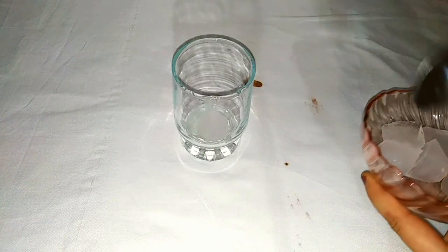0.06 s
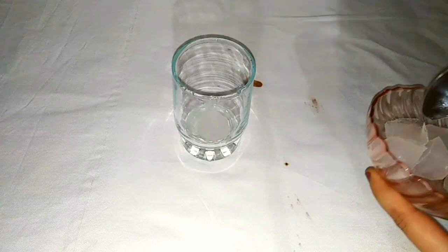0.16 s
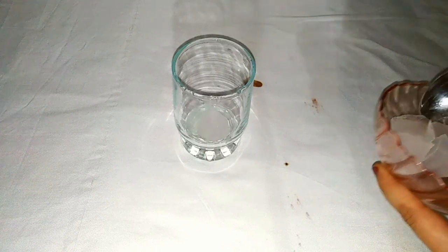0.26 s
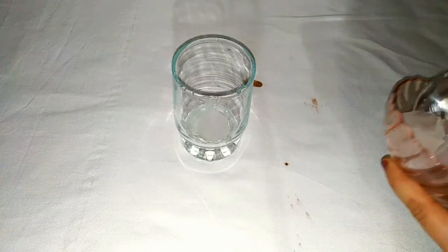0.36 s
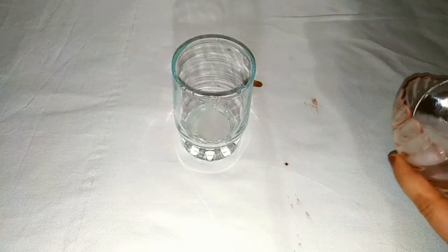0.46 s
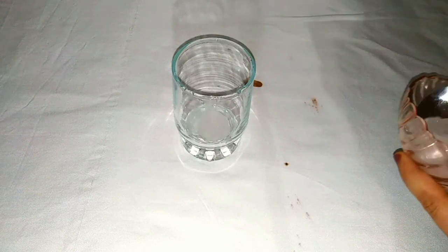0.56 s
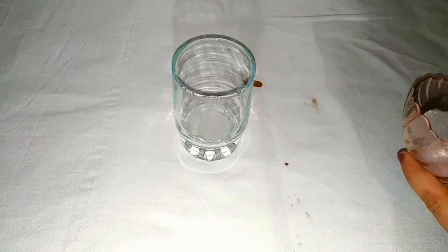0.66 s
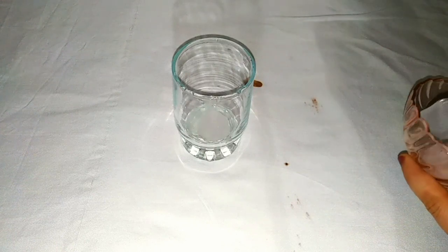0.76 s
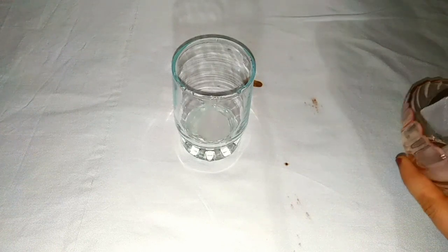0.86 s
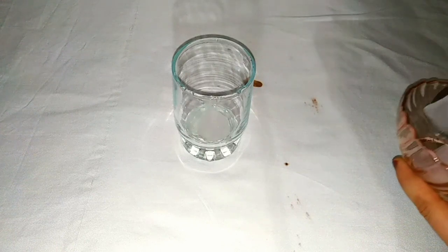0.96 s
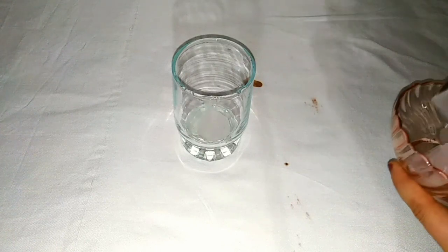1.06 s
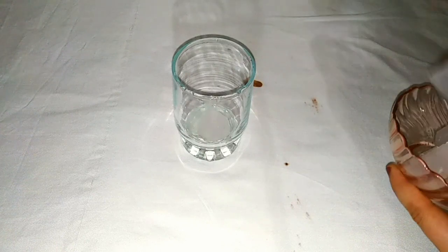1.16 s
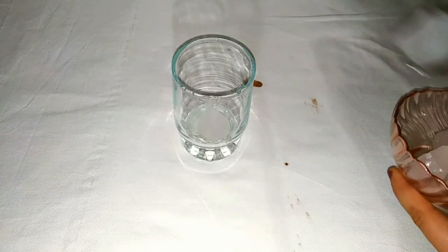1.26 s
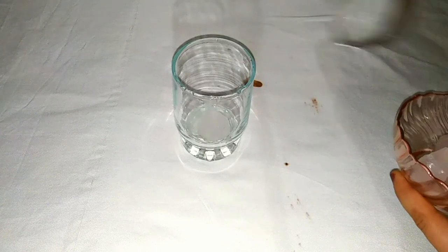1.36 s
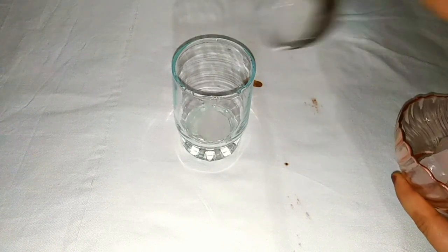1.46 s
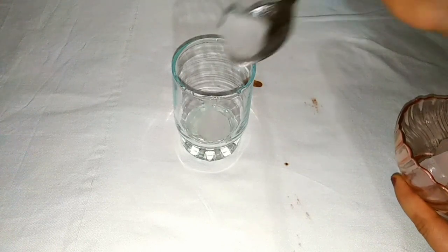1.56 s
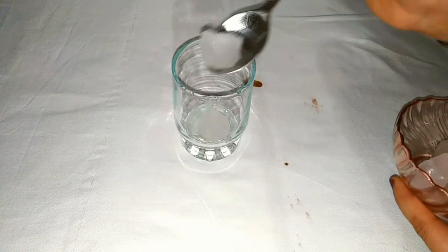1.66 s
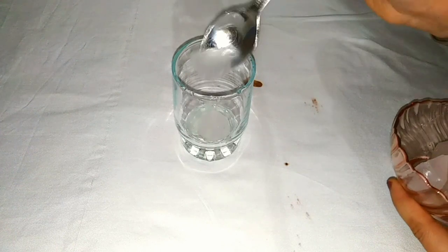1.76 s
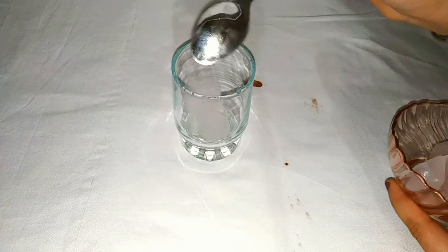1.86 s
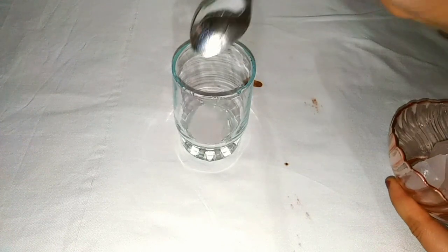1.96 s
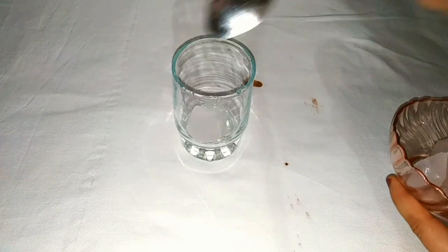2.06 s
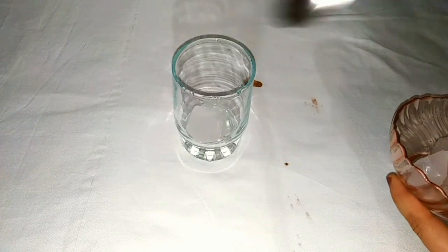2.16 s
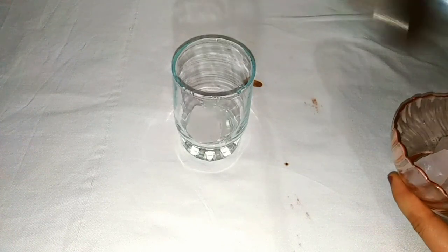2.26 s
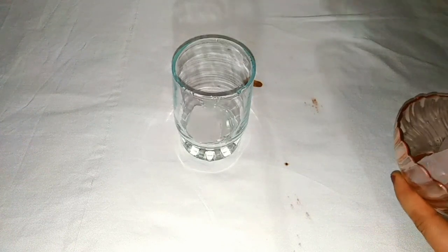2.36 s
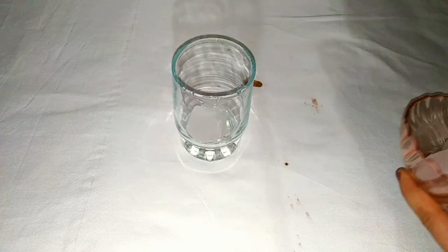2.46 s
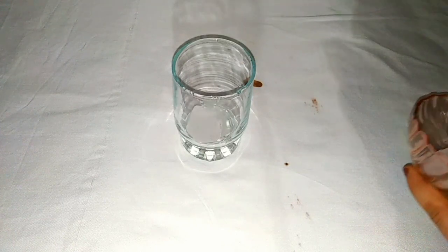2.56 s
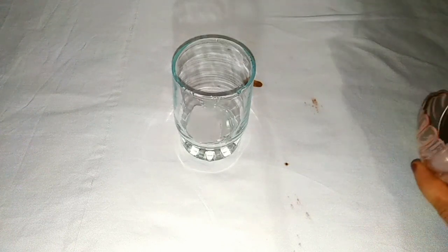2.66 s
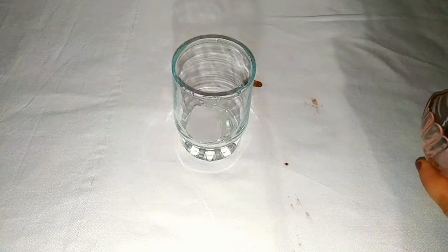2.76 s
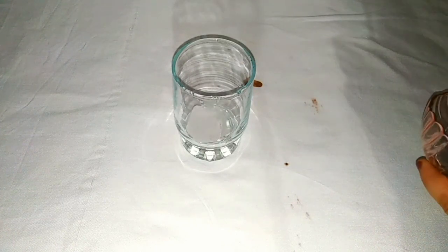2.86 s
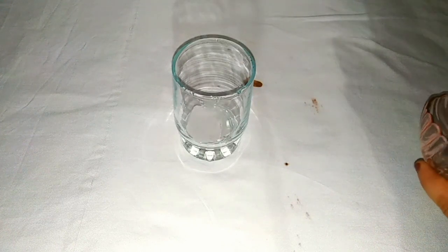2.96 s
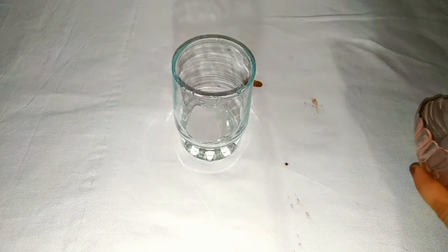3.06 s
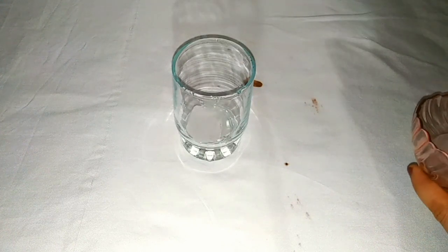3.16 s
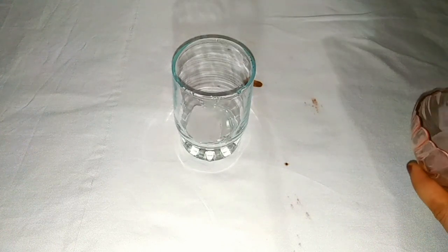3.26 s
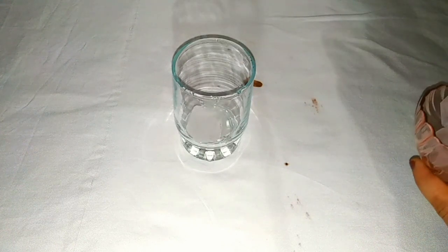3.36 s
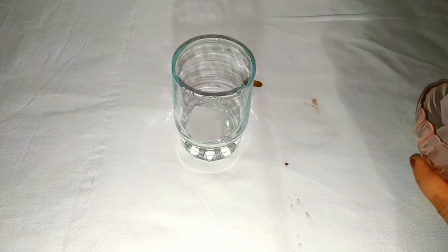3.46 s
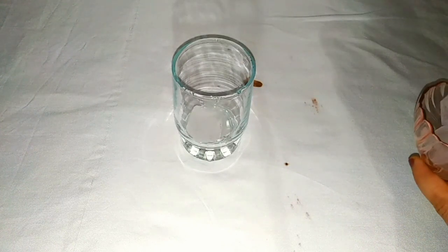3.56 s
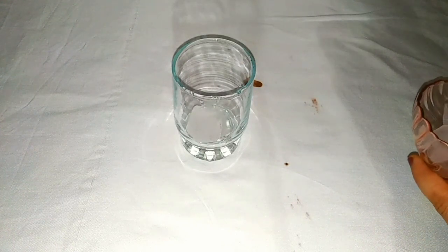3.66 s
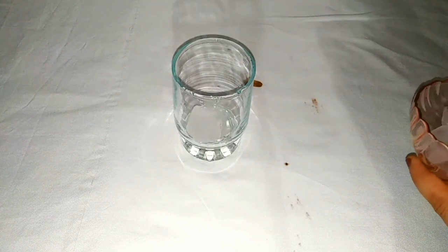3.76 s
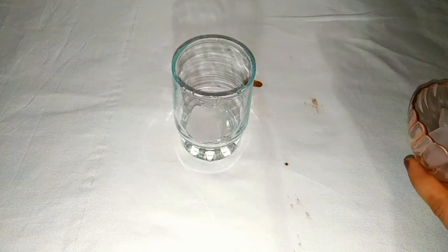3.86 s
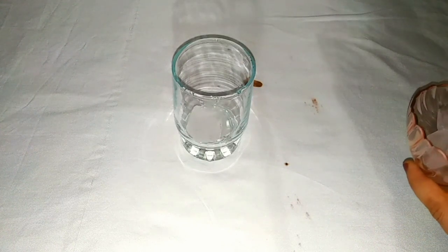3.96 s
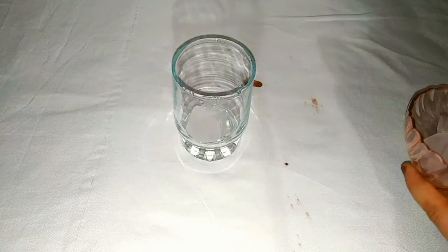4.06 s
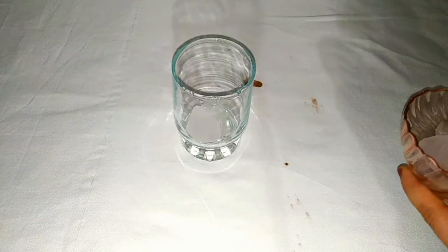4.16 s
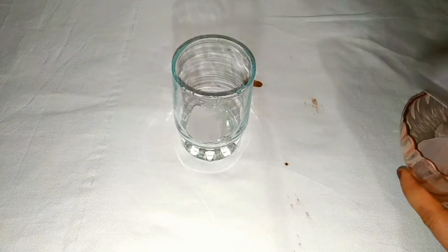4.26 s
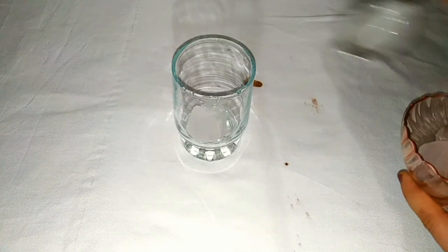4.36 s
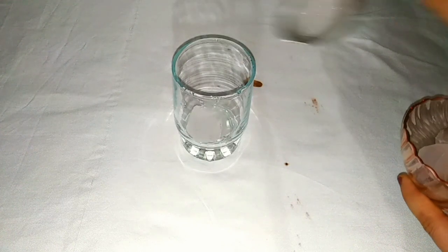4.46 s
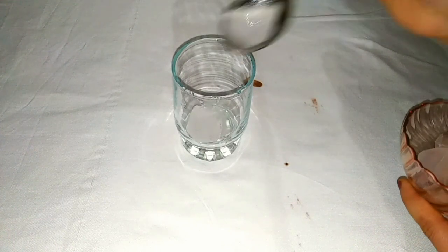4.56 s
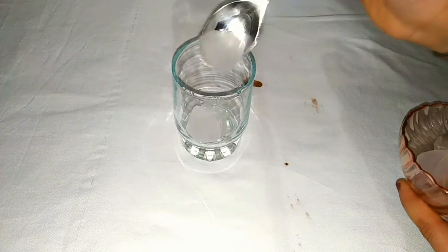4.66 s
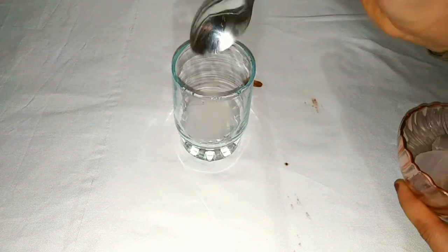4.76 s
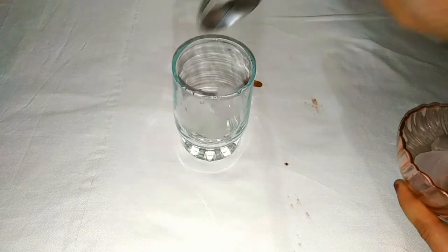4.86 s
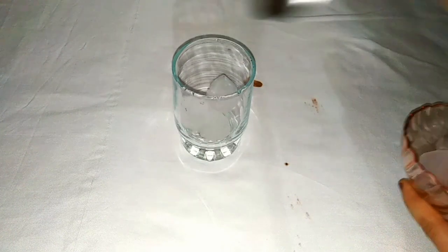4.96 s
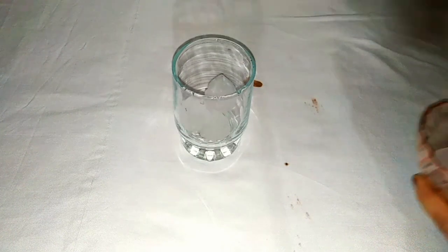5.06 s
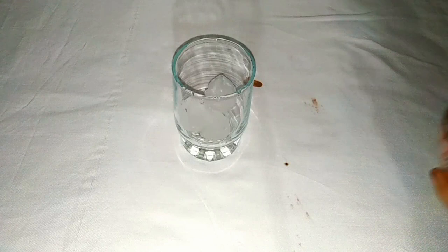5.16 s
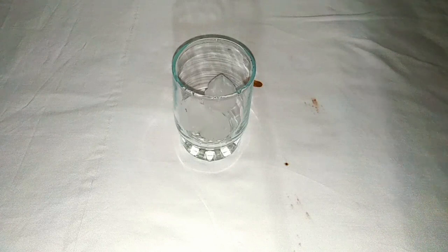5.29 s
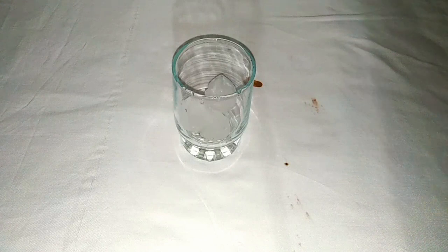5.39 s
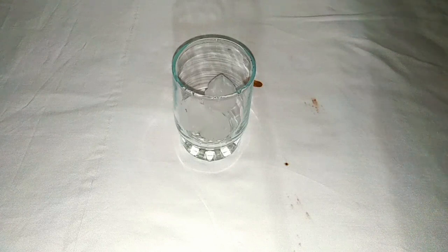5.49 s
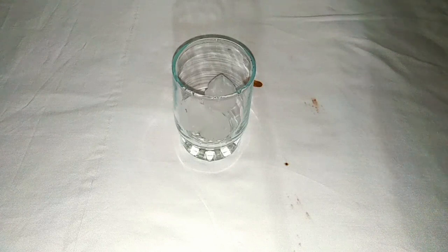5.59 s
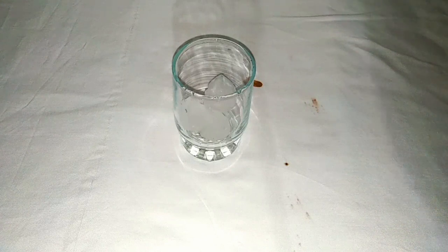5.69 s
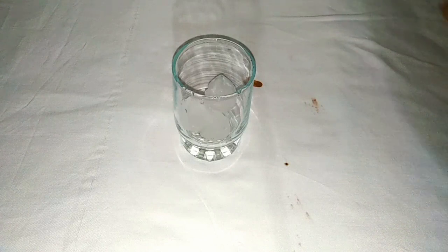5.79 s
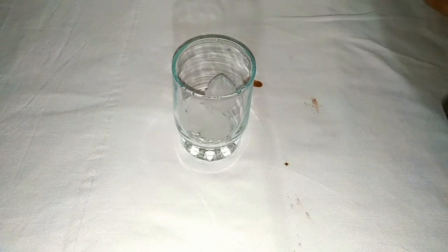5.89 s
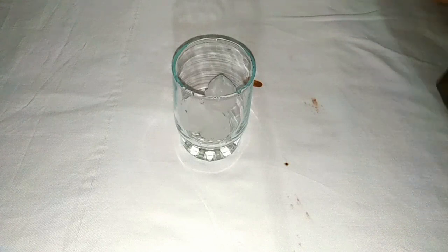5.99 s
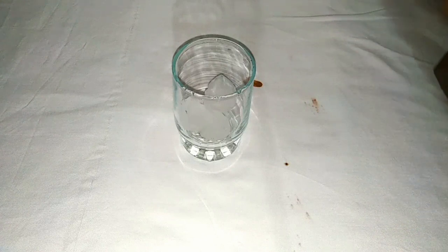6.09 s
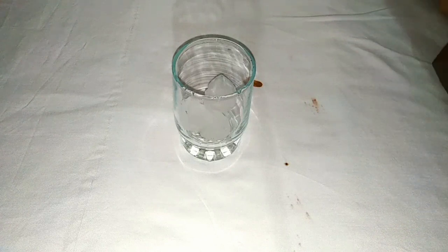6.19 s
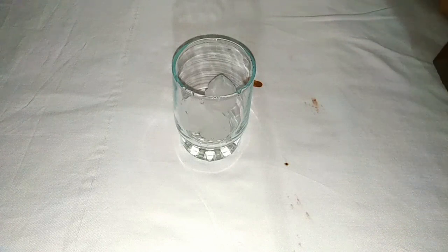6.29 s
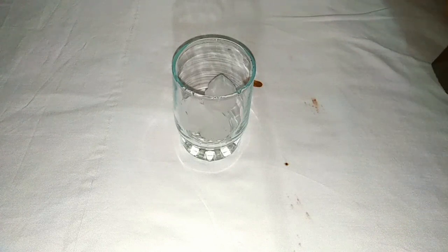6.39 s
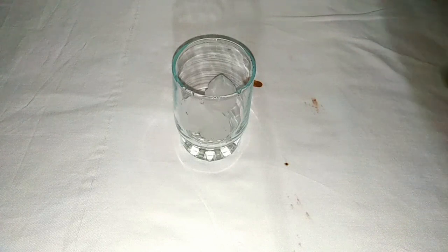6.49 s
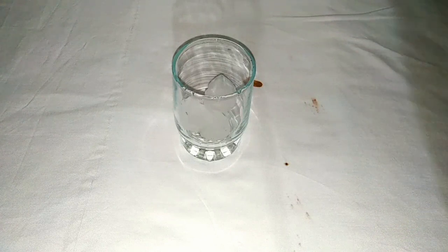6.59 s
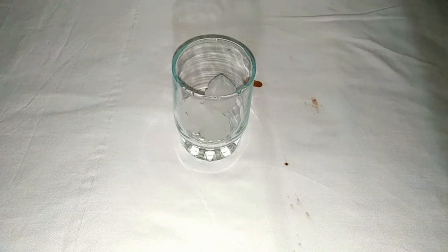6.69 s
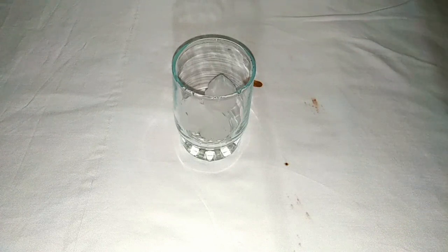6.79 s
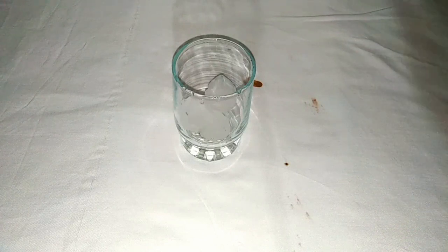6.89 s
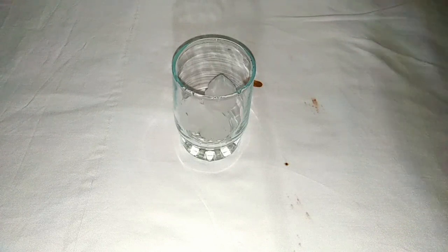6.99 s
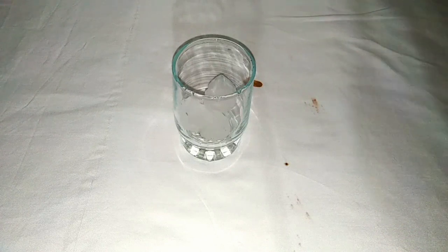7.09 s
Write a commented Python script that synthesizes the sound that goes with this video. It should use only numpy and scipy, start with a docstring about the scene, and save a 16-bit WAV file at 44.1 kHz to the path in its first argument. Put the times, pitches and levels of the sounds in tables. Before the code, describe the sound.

A spoon knocks and digs through ice in a glass bowl, then ice drops with sharp clinks into a drinking glass, twice, in a quiet room.

```python
"""A small quiet room, two microphone ports close to a thick ribbed bowl and a drinking glass, low rumble under all,
with patchy faint noise above it. From 0.4 s a spoon knocks and digs through ice in the bowl: short noise bursts,
short modes, a grind of tiny clicks. At 1.9 s ice drops into the glass: cracks strike its air column and wall modes,
and the ice chokes them. From 2.7 s the spoon digs again, at 4.8 s more ice drops, scattered knocks and a rustle of
cloth end it. Faint bumps, squeaks, tinks and lone tones lie between; decaying noise gives the room's echoes."""
import sys
import numpy as np
from scipy import signal
from scipy.fft import rfft, irfft, next_fast_len
from scipy.io import wavfile
from scipy.ndimage import uniform_filter1d

SR = 44100
rng = np.random.default_rng(int(sys.argv[2]) if len(sys.argv) > 2 else 0)


def generate_wav(signal):
    """Clip the signal to [-1, 1] and save it as 16-bit WAV at the path in sys.argv[1]."""
    frames = np.transpose(np.atleast_2d(signal))
    scaled = np.clip(frames, -1, 1) * 32767
    pcm = np.round(scaled).astype(np.int16)
    wavfile.write(sys.argv[1], SR, pcm)


N = 314735
GLASS_LAG, BOWL_LAG = 10, -9   # samples by which the left port hears later


def amp(db):
    """dB to gain."""
    return 10 ** (np.asarray(db) / 20)


def rms_one(x):
    """Scale to rms 1."""
    return x / np.sqrt(np.mean(x ** 2) + 1e-20)


def at_hz(points, hz):
    """Read a table on a log-frequency axis."""
    table_hz, values = np.array(points).T
    return np.interp(np.log(np.maximum(hz, 1)), np.log(table_hz), values)


def curve_db(rows):
    """Level curve at every sample, -150 dB outside the table."""
    return np.interp(np.arange(N) / SR, *np.transpose(rows), left=-150, right=-150)


def band(x, low_hz, high_hz):
    """Band-pass."""
    return signal.sosfilt(signal.butter(2, [low_hz, high_hz], "band", fs=SR, output="sos"), x)


def split_pass(x, order, hz, kind):
    """Low-pass or high-pass."""
    return signal.sosfilt(signal.butter(order, hz, kind, fs=SR, output="sos"), x)


def colour(x, spectrum):
    """Filter with the gains of a spectrum table in dB, without added phase."""
    size = next_fast_len(N)
    hz = np.arange(size // 2 + 1) * SR / size
    return irfft(rfft(x, size) * amp(at_hz(spectrum, hz)), size)[..., :N]


def drift(rate):
    """Slow random wander of rms 1: noise through two equal poles at rate Hz, computed every 40 samples."""
    r = np.exp(-80 * np.pi * rate / SR)
    slow = signal.lfilter([1], [1, -2 * r, r * r], rng.standard_normal(N // 40 + 2002))[2000:]
    return np.interp(np.arange(N) / 40, np.arange(len(slow)), rms_one(slow))


def strokes(rows, rise, fall):
    """Gain of strokes that rise, hold along a slope and fall away (rise and fall in dB per s)."""
    t = np.arange(N) / SR
    total = 0
    for start, length, from_db, to_db in rows:
        end = start + length
        slope_db = np.interp(t, [start, end], [from_db, to_db])
        total = total + amp(slope_db - rise * np.maximum(start - t, 0) - fall * np.maximum(t - end, 0))
    return total


def clicks(s, db):
    """A click train."""
    out = np.full(N, 1e-18)
    np.add.at(out, np.round(np.asarray(s) * SR).astype(int), amp(db))
    return out


def ring(x, hz, t60):
    """A mode: a unit click sets a dying sine of height 1 ringing."""
    r, w = amp(-60 / (t60 * SR)), 2 * np.pi * hz / SR
    return signal.lfilter([0, np.sin(w)], [1, -2 * r * np.cos(w), r * r], x)


def strike(x, hz, t60):
    """A soft contact feeds a mode only with what lies near its pitch."""
    peak = signal.iirpeak(hz, 7, fs=SR)
    return ring(signal.lfilter(*peak, signal.lfilter(*peak, x)), hz, t60)


def crack(x, t60):
    """Each click becomes a burst of noise that swells for a moment and dies at once."""
    swell = amp(-60 / (.003 * SR))
    poles = np.convolve([1, -amp(-60 / (t60 * SR))], [1, -swell])
    return signal.lfilter([1 - swell], poles, x) * rng.standard_normal(N)


def ports(x, pan_db, lag):
    """Two microphone ports: a left-over-right level difference and a lag."""
    left = np.roll(x, max(lag, 0)) * amp(pan_db / 2)
    right = np.roll(x, max(-lag, 0)) * amp(-pan_db / 2)
    return np.array([left, right])


# Spectrum of the low rumble: f/Hz, relative level per Hz/dB
RUMBLE_SPECTRUM = [(15, -66.5), (25, -29.5), (59, -4.5), (111, 1), (200, -5.5), (229, -3.5), (263, -6),
                   (607, -15), (695, -27.5), (887, -22), (1230, -47), (2160, -39.5), (3620, -48),
                   (12900, -48.5), (16000, -55.5)]
# How alike the rumble is at both ports: f/Hz, likeness (0 none, 1 full)
RUMBLE_LIKENESS = [(60, 0.24), (240, 0.86), (950, 0), (3770, 0.053), (15000, 0)]
# Lean of the rumble to the left port: f/Hz, left-right level/dB
RUMBLE_LEAN = [(60, -1), (240, -1), (950, 0), (3770, -3), (15000, 1)]
# Level of the patchy faint noise between 500 and 1000 Hz: t/s, level/dB
PATCHY_LEVEL = [(0, -103), (.2, -60), (.8, -66), (1.8, -93), (2.1, -62), (2.6, -77), (3.1, -73), (3.9, -53),
                (4.3, -102.5), (5.0, -64), (5.5, -81), (6.1, -83), (6.3, -67), (7.13, -72.5)]


def hush():
    """Low rumble, partly alike at both ports, its low octaves heaving, and patchy noise strips at 500-1000 Hz."""
    mid, side, other = rng.standard_normal((3, N))
    hz, alike = np.array(RUMBLE_LIKENESS).T
    mid = colour(mid, np.c_[hz, 10 * np.log10(1 + alike)])
    side = colour(side, np.c_[hz, 10 * np.log10(1 - alike)])
    lean = np.array(RUMBLE_LEAN)
    pair = np.array([colour(mid + side, lean * [1, .5]), colour(mid - side, lean * [1, -.5])])

    noise, edges = other + .6 * rng.standard_normal((2, N)), np.geomspace(500, 980, num=7)
    # each narrow strip comes and goes by itself
    patchy = rms_one(sum(band(noise, lo, hi) * amp(6 * drift(2)) for lo, hi in zip(edges, edges[1:])))

    steady = rms_one(colour(pair, RUMBLE_SPECTRUM))
    together_db = 2.5 * drift(4)
    # each low octave heaves partly with the others, partly alone
    lumps = sum(band(steady, lo, 2 * lo) * (amp(together_db + 2.5 * drift(5)) - 1)
                for lo in (60, 120, 240, 480))
    return amp(-56.5) * (steady + lumps) + amp(curve_db(PATCHY_LEVEL)) * patchy


# Decay of the echoes: f/Hz, t60/s
ROOM_DECAY = [(600, 0.37), (1500, 0.32), (2800, 0.29), (4200, 0.31), (6500, 0.27), (9000, 0.29),
              (12000, .25)]
# What the walls return: f/Hz, relative level/dB
WALL_COLOUR = [(500, 7.5), (1500, -4.5), (4000, -2.5), (7000, -6), (12000, -5)]


def room(x):
    """Diffuse echoes: noise dying band by band, different at each port, swelling in over about 2 ms."""
    t, edges = np.arange(SR // 2) / SR, 300 * 2 ** np.arange(0, 6.1, .5)
    white = rng.standard_normal((2, len(t)))
    tail = sum(band(white, lo, hi) * amp(-60 * t / at_hz(ROOM_DECAY, np.sqrt(lo * hi)))
               for lo, hi in zip(edges, edges[1:]))
    tail = colour(tail, WALL_COLOUR)[:, :len(t)] * (1 - np.exp(-t / 0.002))
    tail = tail / np.sqrt(np.sum(tail ** 2) / 2)
    return signal.fftconvolve(x[None], tail, axes=1)[:, :N]


# A sleeve brushing the tablecloth: t/s, length/s, relative level at start/dB, at end/dB
SLEEVE_STROKES = [(.18, .04, -79, -84), (1.21, 0.056, -103, -84), (4.57, .03, -79, -80),
                  (6.37, 0.029, -74.5, -76), (6.66, 0.14, -64, -72), (6.95, 0.16, -79, -80.5)]
# Spectrum of the cloth: f/Hz, relative level/dB
CLOTH_SPECTRUM = [(880, -50), (1500, -29), (2400, -10.5), (4900, -4), (7700, -4), (8350, -22.5),
                  (13000, -40)]


def rustle():
    """Sleeve on tablecloth: patchy hiss, only slightly alike at both ports."""
    hiss = colour(rng.standard_normal(N) + 3.3 * rng.standard_normal((2, N)), CLOTH_SPECTRUM)
    patches = amp(2.2 * drift(20) + 2 * drift(120))
    return rms_one(hiss) * patches * strokes(SLEEVE_STROKES, rise=240, fall=130)


# Dull bumps through the table: t/s, relative level/dB, f/Hz, left-right level/dB
TABLE_BUMPS = [(0.22, -32.5, 95.2, 37), (0.247, -36, 90.2, 20), (2.316, -34.5, 97, 11.5),
               (2.418, -43, 91, 19), (4.395, -38.5, 84, 16.5)]


def table_bumps():
    """Bumps through the table: 10 ms soft pushes set low, short modes ringing."""
    push = np.hanning(SR // 100) / (SR // 200)
    return sum(ports(ring(signal.oaconvolve(clicks([start], db), push)[:N], hz, t60=.15), pan_db, 0)
               for start, db, hz, pan_db in TABLE_BUMPS)


# Faint lone tones: t/s, f/Hz, relative level/dB, t60/s
LONE_TONES = [(.001, 1960, -54, 0.12), (2.409, 2913, -62, 0.68), (4.159, 1123, -58, 0.073)]


def lone_tones():
    """Faint sines that swell in over about 30 ms, waver and die away."""
    t = np.arange(N) / SR
    swell = np.exp(-t[:SR // 5] / 0.03)
    out = 0
    for start, hz, db, t60 in LONE_TONES:
        decay = amp(np.minimum(db - 60 * (t - start) / t60, 0)) * (t > start)
        level = signal.oaconvolve(decay, swell / swell.sum())[:N]
        out = out + level * amp(6.5 * drift(35)) * np.sin(2 * np.pi * hz * t)
    return out


# Wet squeaks on the spoon: t/s, start f/Hz, end f/Hz, length/s, relative level/dB
SPOON_SQUEAKS = [(1.221, 11840, 8700, 0.022, -53), (1.256, 11400, 8240, 0.034, -49.5)]


def squeaks():
    """Wet slips on the spoon: short falling glides, uneven in level."""
    t = np.arange(N) / SR
    out = 0
    for start, from_hz, to_hz, length, db in SPOON_SQUEAKS:
        u = np.clip((t - start) / length, 0, 1)
        glide = np.sin(2 * np.pi * np.cumsum(from_hz + (to_hz - from_hz) * u) / SR)
        out = out + amp(db + 9.3 * drift(220)) * np.sin(np.pi * u ** .6) ** 2 * glide
    return out


# The bare spoon touched: t/s, then relative level/dB of each of its three modes
SPOON_TOUCHES = [(5.569, -63, -63, -58), (5.6471, -57.5, -77, -82), (5.9464, -69.5, -65.5, -99)]
# Modes of the spoon: f/Hz, t60/s
SPOON_MODES = [(11100, 0.18), (12700, .3), (13700, 0.23)]


def spoon_tinks():
    """Touches on the bare spoon ring its three high modes."""
    s, *modes_db = np.transpose(SPOON_TOUCHES)
    return sum(strike(clicks(s, db), hz, t60) for db, (hz, t60) in zip(modes_db, SPOON_MODES))


def small_sounds():
    """Tinks, squeaks and tones placed at the bowl, with table bumps; returns near sound and room feed."""
    faint = spoon_tinks() + squeaks() + lone_tones()
    return ports(faint, -1.3, BOWL_LAG) + table_bumps(), faint * amp(-10.0)


# The spoon digs: t/s, length/s, relative level at start/dB, at end/dB, treble over that/dB
DIGS = [(0.45, 0.37, -49, -54.5, -0.5), (2.675, 0.3, -61, -44.5, -1), (2.982, .25, -51, -48.5, 8.5),
        (3.618, 0.332, -54, -57.5, 7), (5.601, 0.18, -48.5, -52.5, -15.5)]
# Colour of the small grinding cracks: f/Hz, relative level per Hz/dB
GRAIN_COLOUR = [(400, -21.5), (1100, -4), (2500, -5.5), (5000, -7.5), (7500, -5), (9000, -31.5),
                (12500, -10), (15000, -32)]


def ice_grind():
    """The spoon digs through ice: clumped random clicks, each ringing one of ten short resonances."""
    grains_per_s, clump_db = 810, 4.5   # median rate, its swing
    chance = grains_per_s * amp(clump_db * drift(12)) / SR
    strength = amp(4.0 * np.minimum(rng.exponential(1, N), 4)) * rng.choice([-1, 1], N)
    grains = (rng.random(N) < chance) * strength
    dealt, pitches = rng.integers(0, 10, N), np.geomspace(900, 13000, num=10)
    crunch = sum(ring(grains * (dealt == k) + 1e-18, hz, 7.45 / hz) * np.sqrt(hz)
                 for k, hz in enumerate(pitches))
    crunch = rms_one(colour(crunch, GRAIN_COLOUR))
    treble, body = split_pass(crunch, 4, 8500, "high"), split_pass(crunch, 4, 8500, "low")
    rows = np.array(DIGS)
    treble_rows = np.c_[rows[:, :2], rows[:, 2:4] + rows[:, 4:]]
    return body * strokes(rows[:, :4], rise=464, fall=138) + treble * strokes(treble_rows, rise=464, fall=138)


# Spoon and ice knocking in the bowl: t/s, then relative level/dB of crack, dull part, bright part
# and low ring, then left-right level/dB
BOWL_KNOCKS = [(0.3928, -19, -28.5, -13.5, -30, 7.5), (0.4216, -22.5, -21.5, -62, -61, -0.5),
               (0.4542, -40, -36, -31, -55.5, -14), (0.471, -21, -12.5, -24.5, -58.5, 0.5),
               (0.4941, -15.5, -18.5, -36, -51, -5.5), (0.5542, -21.5, -27, -35, -66, 3),
               (0.5631, -23, -22, -48, -60, 0), (0.6372, -26, -28.5, -27.5, -48, -4.5),
               (0.7472, -14.5, -17, -55, -46, -5.5), (0.7542, -19, -18, -33, -49.5, 3),
               (0.7621, -21, -21.5, -54, -46, 4), (0.804, -52, -32, -48, -68, -8),
               (0.8432, -25, -29, -46, -39.5, 0), (0.8597, -24, -30, -67, -48, -2),
               (0.9085, -27, -17.5, -68, -32, -1.5), (1.21, -63, -46, -74, -101, 2.5),
               (1.245, -66.5, -48, -75, -87, -4), (1.334, -52.5, -30, -77, -82.5, -5),
               (2.667, -41.5, -33.5, -53, -65, -10), (2.7697, -28.5, -19, -46, -45, 1),
               (2.8469, -25, -22, -41, -54.5, -2.5), (2.887, -28, -26.5, -43, -34.5, -5.5),
               (2.9522, -10, -10, -13, -47.5, 1), (2.972, -46, -23, -50, -55, -2),
               (3.0082, -22, -31, -50, -66, 3), (3.0225, -35, -20, -48, -37.5, 2),
               (3.0285, -20.5, -23, -38, -46, -8), (3.0615, -29, -15.5, -33, -39.5, 2.5),
               (3.067, -19, -28.5, -32, -39, -13), (3.1281, -4.5, -14, -14, -28.5, 1.5),
               (3.1431, -41, -21.5, -45, -30, -1), (3.1806, -16.5, -6, -21.5, -29.5, 0),
               (3.1998, -19, -27, -33, -56, -8), (3.231, -41, -32, -42, -56.5, -3),
               (3.253, -17, -21, -43, -32, -2.5), (3.2671, -42, -22.5, -35, -54, -6),
               (3.2951, -15.5, -22.5, -39, -37.5, -1), (3.3604, -33.5, -28, -42.5, -71, 0),
               (3.5071, -38, -24, -53, -64.5, -4.5), (3.5196, -41.5, -19.5, -64, -68, -0.5),
               (3.541, -48, -38, -57, -71.5, -8), (3.5752, -57, -26.5, -47, -71, -1),
               (3.6244, -33, -20.5, -43, -67.5, -1), (3.6297, -36, -37, -56, -72, -3),
               (3.6616, -41, -17.5, -37, -47, -1), (3.6663, -12.5, -14, -24, -54, 3),
               (3.68, -35, -27, -46, -53.5, -2), (3.713, -16.5, -20.5, -18.5, -52, -10),
               (3.7196, -27, -22, -47, -60, 0), (3.763, -44, -32.5, -43, -69.5, -4),
               (3.8149, -19, -17.5, -24.5, -52.5, 2), (3.8384, -18, -19, -25, -30.5, -5),
               (3.8756, -21, -15, -25.5, -41, -6), (3.9024, -42, -28, -51, -55.5, -6),
               (4.013, -32.5, -37.5, -51, -66, -15.5), (4.025, -25, -62, -49.5, -60.5, 2.5),
               (4.7145, -43, -63.5, -60.5, -92, -6.5), (5.263, -18, -28.5, -62, -59, -1.5),
               (5.557, -44, -58, -71, -81, 0), (5.5897, -22.5, -28, -61, -73, 1.5),
               (5.6459, -31, -23, -51.5, -43, 0), (5.7587, -38, -25, -73.5, -63, 2.5),
               (6.005, -58, -57.5, -79.5, -91, 0.5), (7.0672, -60, -62, -63, -99, 4)]
# Bowl modes: relative level/dB, t60/s
BOWL_MODES = [(-10, 0.046), (0.5, 0.027), (-0.5, 0.05), (0.5, 0.051), (-6.5, 0.038), (-13.5, 0.07),
              (3, .06), (-13.5, 0.044), (-11, 0.045)]
# Pitch of each bowl mode: f/Hz
BOWL_PITCHES = [1405, 2046, 3505, 3575, 5491, 6783, 7671, 10140, 12720]
# Ring that drives each bowl mode: 0 deepest, 1 low, 2 middle, 3 high
BOWL_DRIVE = [0, 0, 1, 1, 2, 2, 3, 3, 3]


def bowl():
    """Knocks as noise in three colours plus modes of the bowl, over the grind; returns near sound and room feed."""
    s, crack_db, dull_db, bright_db, low_db, pan_db = np.transpose(BOWL_KNOCKS)
    deep_ring_db, high_ring_db = dull_db - 25, bright_db - 15
    middle_ring_db = 14.5 + 1.4 * crack_db + 0.54 * low_db   # follows crack and low ring
    ring_db = [deep_ring_db, low_db, middle_ring_db, high_ring_db]
    spread_db = rng.normal(0, 3, (len(s), len(BOWL_MODES)))   # each knock lands somewhere else

    def knocks(gain_db):
        """Dull, middle and bright noise bursts."""
        dull = crack(clicks(s, gain_db + dull_db), t60=0.036)
        dull = band(band(band(dull, 1200, 3100), 530, 4400), 500, 2700)
        middle = crack(clicks(s, gain_db + crack_db), t60=0.0082)
        middle = band(band(band(middle, 1500, 7300), 1500, 7500), 1700, 7800)
        bright = crack(clicks(s, gain_db + bright_db), t60=0.0091)
        return dull + middle + band(band(bright, 7000, 12000), 6300, 19845)

    def rings(gain_db):
        """Every knock strikes every mode of the bowl."""
        total = 0
        for k, (db, t60) in enumerate(BOWL_MODES):
            blow_db = gain_db + ring_db[BOWL_DRIVE[k]] + db + spread_db[:, k]
            total = total + strike(clicks(s, blow_db), BOWL_PITCHES[k], t60)
        return total

    state = rng.bit_generator.state   # both ports hear the same crack
    left = knocks(pan_db / 2) + rings(pan_db / 2)
    rng.bit_generator.state = state
    right = knocks(-pan_db / 2) + rings(-pan_db / 2)
    grind = ice_grind()
    near = np.array([left, np.roll(right, -BOWL_LAG)]) + amp(-8.5) * ports(grind, -1.5, BOWL_LAG)
    return near, amp(-2) * grind + amp(-8) * (left + right) / 2


# Ice on the drinking glass: t/s, then relative level/dB of crack, air column, lowest wall mode, middle
# and treble wall modes, then choke/dB (held between -15 and 0)
ICE_DROPS = [(1.8796, -27.5, -50.5, -45, -32, -28, -6), (1.945, -8.5, -13, -34.5, -26, -21, 4),
             (1.9604, -13, -20, -41, -17.5, -45, 0), (1.9824, -32, -53, -26, -37, -35, -23.5),
             (2.0064, -46, -77, -38.5, -63, -46, -19), (2.2084, -59, -70, -58.5, -83, -93, 0),
             (4.807, -5.5, -20.5, -20, -22, -16, -5), (4.8224, -14.5, -20.5, -23.5, -22, -34, -3.5),
             (4.8549, -16, -19.5, -40, -37, -36, 3), (4.8944, -29, -58, -37, -32.5, -40.5, -30),
             (4.9661, -31, -50, -75, -43, -44.5, -25), (4.9964, -21, -23.5, -31.5, -41, -38, 0),
             (5.006, -22, -41.5, -74.5, -65, -36, -14.5), (5.0244, -50.5, -54, -66.5, -70, -70, -6),
             (5.475, -66, -69, -98, -91.5, -62.5, -15.5), (5.5294, -62, -72, -91, -87, -58.5, -1)]
# Glass modes, air column first, then wall modes: relative level/dB, t60/s, left-right level/dB
GLASS_MODES = [(-6.5, 0.41, -2.5), (-2.5, 0.35, -16), (-15, 0.053, -1.5), (-3.5, 0.26, 14.5),
               (-8.5, 0.38, -2.5), (-16.5, .15, 4.5), (-8, 0.23, -8.5), (4, 0.031, -13.5),
               (-12, 0.11, -7.5), (4, 0.048, -6.5), (-4, 0.081, -15.5), (-6.5, 0.05, -10), (-7.5, 0.015, 4)]
# Pitch of each glass mode: f/Hz
GLASS_PITCHES = [880, 1957, 4479, 4503, 2471, 3187, 8263, 9940, 7400, 11315, 11953, 13045, 13280]
# Blow strength that drives each mode: 0 air column, 1 lowest wall, 2 middle wall, 3 treble wall
GLASS_DRIVE = [0, 1, 2, 2, 2, 2, 3, 3, 3, 3, 3, 3, 3]


def glass():
    """Every blow cracks, chokes what still rings and drives each group of modes; returns near and room feed."""
    s, crack_db, *groups_db, choke_db = np.transpose(ICE_DROPS)
    snap_colour = [(400, -22.0), (1500, -4.5), (4300, 0.0), (6500, 2), (9000, -9.0), (12000, -11), (16000, -17.5)]
    snap = colour(crack(clicks(s, crack_db), t60=0.017), snap_colour)
    to_walls = crack(clicks(s, crack_db - 19), t60=0.02)

    choke_s = .006   # time the ice takes to damp the glass
    lost_db = np.cumsum(np.clip(choke_db, -15, 0))   # all damping so far
    lost_now_db = np.r_[0, lost_db][np.searchsorted(s, np.arange(N) / SR + choke_s / 2)]
    alive = amp(uniform_filter1d(lost_now_db, int(choke_s * SR)))

    near = ports(snap, -15.0, GLASS_LAG)
    for group, hz, (db, t60, pan_db) in zip(GLASS_DRIVE, GLASS_PITCHES, GLASS_MODES):
        # a new blow is raised by the damping so far, so only older ringing is choked
        mode = strike(clicks(s, groups_db[group] + db - lost_db), hz, t60)
        waver = amp(3.0 * drift(79))   # loose ice makes each mode waver
        near = near + ports(alive * waver * mode, pan_db, GLASS_LAG)
    return near, band(to_walls, 2500, 7000) * amp(19.0) + amp(-4.5) * near.mean(0)


def scene():
    """All sources near the ports, plus the room, the rumble and the cloth."""
    parts = [glass(), bowl(), small_sounds()]
    near_sum = sum(near for near, feed in parts)
    return near_sum + room(sum(feed for near, feed in parts)) + hush() + rustle()


def record(dry):
    """Deep bass is thin, a dip lies near 9 kHz, highs fade above 13.8 kHz and are gone by 16.5 kHz, peaks round."""
    thin = split_pass(dry, 3, 55, "high")
    dipped = thin - .6 * signal.lfilter(*signal.iirpeak(9000, 4.0, fs=SR), thin)
    dull = split_pass(dipped, 6, 13800, "low")
    held = 1.3 * np.tanh(dull / 1.3)   # the loudest peaks are rounded
    return signal.sosfilt(signal.cheby2(12, 70, 16500, fs=SR, output="sos"), held)


dry = scene()
out = record(dry)
generate_wav(out)
```